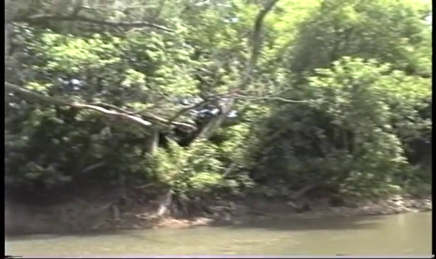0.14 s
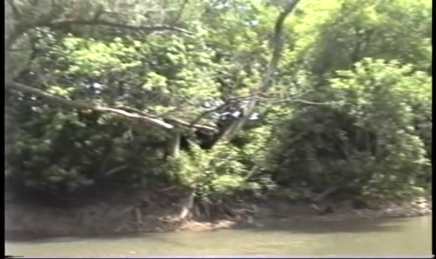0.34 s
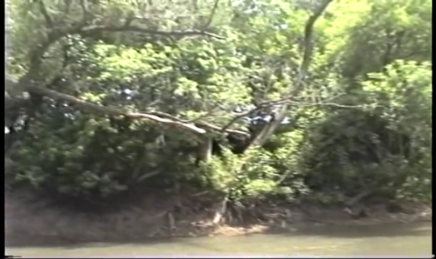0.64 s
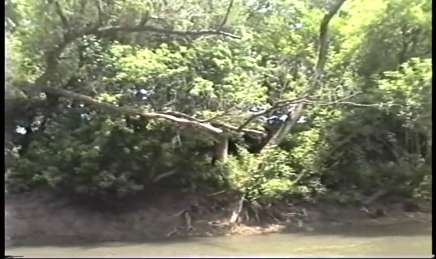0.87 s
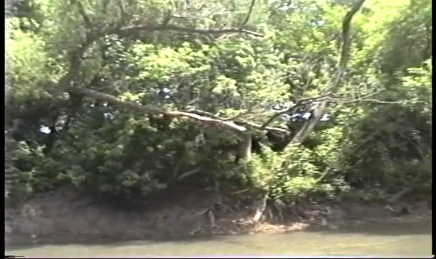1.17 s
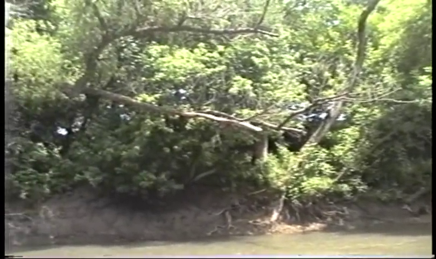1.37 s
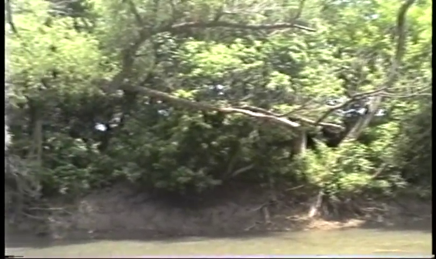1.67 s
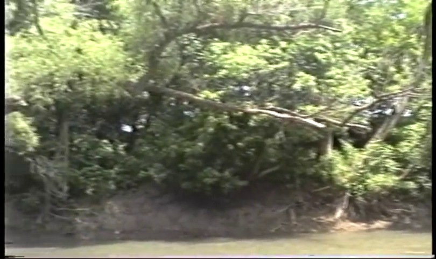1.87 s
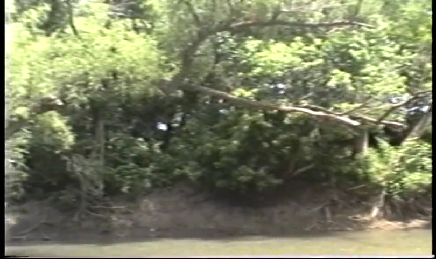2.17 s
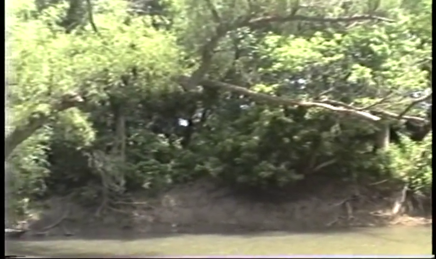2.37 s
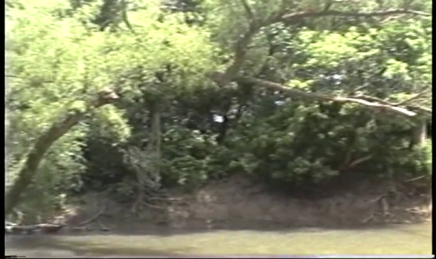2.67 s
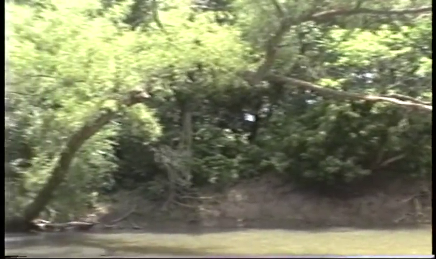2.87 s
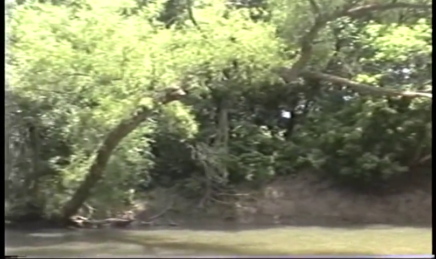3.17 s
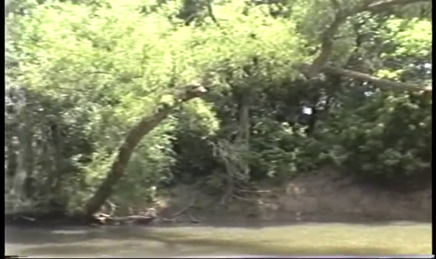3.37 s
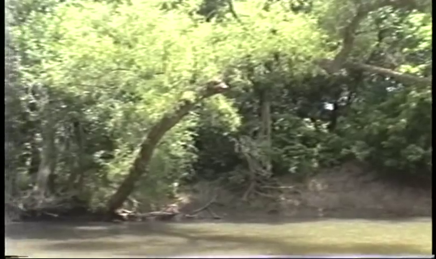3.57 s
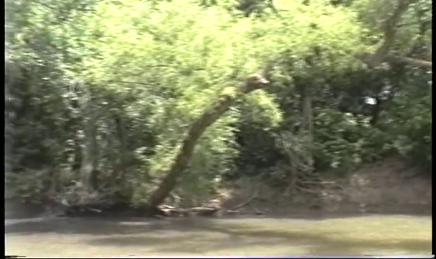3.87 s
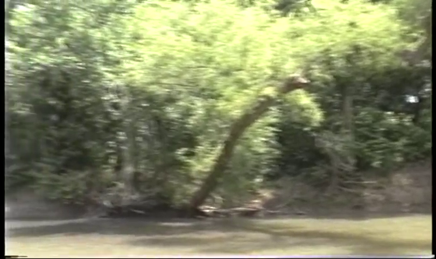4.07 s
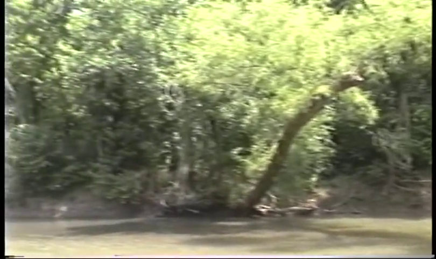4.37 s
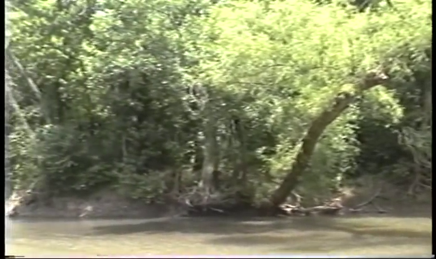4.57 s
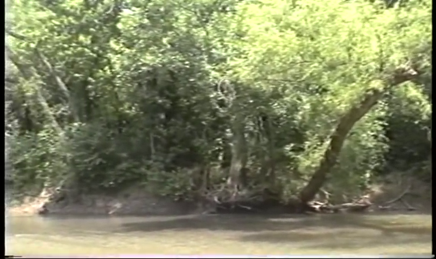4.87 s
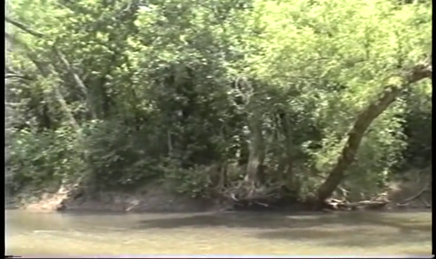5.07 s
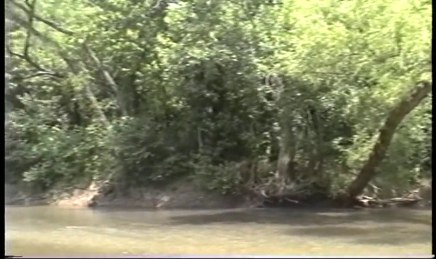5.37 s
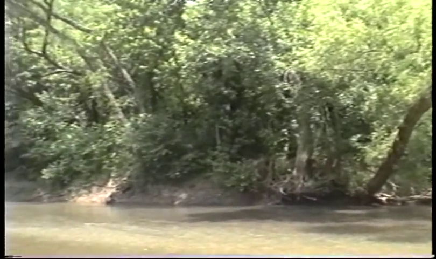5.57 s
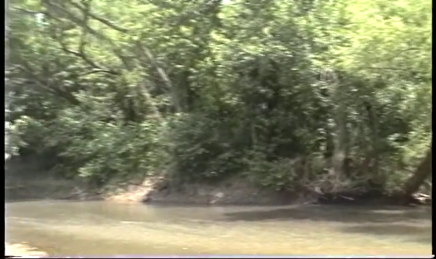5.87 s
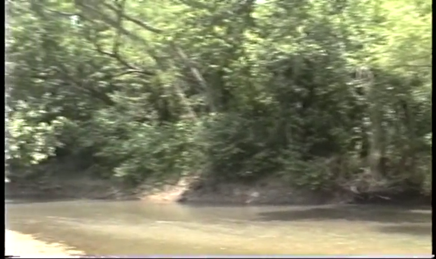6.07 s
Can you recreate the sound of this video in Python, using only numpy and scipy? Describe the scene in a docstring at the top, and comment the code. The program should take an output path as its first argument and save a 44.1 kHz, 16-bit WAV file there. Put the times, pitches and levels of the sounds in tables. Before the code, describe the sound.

A huge crowd of cicadas drones loudly in riverside woods, a harsh, high, shimmering buzz over a faint low motor hum from the camera.

```python
"""Cicadas fill the woods on a river bank, ahead and on both flanks, while a tape camcorder turns slowly left.
Thousands of tymbal clicks ring bodies of many sizes and merge into a drone that drifts in level and pitch.
Water and leaves murmur underneath as shaped noise, and one small knock sounds.
The camcorder picks up its own head drum as steady lines, stores sum and difference of its two sides
on companded tracks with hiss, and overloads both at loud peaks."""
import sys
import numpy as np
from scipy import signal
from scipy.fft import rfft, irfft
from scipy.io import wavfile
from scipy.ndimage import uniform_filter1d

SR = 44100
rng = np.random.default_rng(int(sys.argv[2]) if len(sys.argv) > 2 else 0)


def master_out(mix):
    """Clip the mix to full scale and print it as 16-bit PCM to the path in sys.argv[1]."""
    frames = np.transpose(np.atleast_2d(mix))
    ceiling = np.clip(frames, -1, 1)
    pcm = np.round(ceiling * 32767).astype(np.int16)
    wavfile.write(sys.argv[1], SR, pcm)


N = 274743
TIME = np.arange(N) / SR


def undb(db):
    """Amplitude factor of a level in dB."""
    return 10 ** (np.asarray(db) / 20)


def unit(x):
    """The same sound at an rms of 1."""
    return x / np.sqrt(np.mean(x ** 2))


# water and leaves around the microphone, as noise density:
# columns f/Hz, level of the sum/dB per Hz, level of the difference/dB per Hz, left minus right/dB
MURMUR_SPECTRUM = [(20, -74.5, -66, 3.5), (54, -75.5, -64.5, 3.5), (124, -78, -71.5, 1), (383, -80, -76, 2),
                   (910, -85, -81, 3.5), (1940, -87, -85, 2.5), (3270, -89.5, -98, 8),
                   (8800, -105, -105, 3), (14500, -102, -94, 0)]


def murmur():
    """Water and leaves: smooth noise, strongest in the bass and there wider than it is centred."""
    hz, *columns = np.transpose(MURMUR_SPECTRUM)
    log_bins = np.log(np.arange(N // 2 + 1) * SR / N + 1)
    sum_db, difference_db, pan_db = (np.interp(log_bins, np.log(hz), c) for c in columns)

    def noise_spectrum(density_db):
        """White noise shaped to a density per Hz."""
        return undb(density_db) * rfft(rng.standard_normal(N)) * np.sqrt(SR / 2)

    both = noise_spectrum(sum_db)
    apart = noise_spectrum(difference_db)
    left = (both + apart) * undb(pan_db / 2)
    right = (both - apart) * undb(-pan_db / 2)
    return irfft(np.array([left, right]), N)


DRUM_HZ = 29.97  # turning rate
DRUM_RIGHT_DB = -8.5  # right side against left
# strongest lines of the head drum, inside the camcorder:
# columns f/multiple of the turning rate, level on the left/dB rms
DRUM_LINES = [(1.0, -48), (1.5, -60), (2.0, -47), (3.0, -57), (8.0, -60), (15.0, -65), (16.0, -63),
              (17.0, -62), (18.0, -65), (20.0, -65), (31.0, -67), (32.0, -60), (36.0, -66)]
# faint combs of lines under them:
# columns f spacing/multiple of the turning rate, level on the left at the 10th multiple/dB rms
DRUM_COMBS = [(1.0, -69), (1.5, -71)]
COMB_DB_PER_OCTAVE, COMB_SCATTER_DB = -2.5, 2
COMB_TOP = 60  # multiples stay below this


def drum():
    """Head drum: steady lines on its turning rate, shaking the two sides in opposite sign."""
    lines = dict(DRUM_LINES)
    for spacing, db in DRUM_COMBS:
        for multiple in np.arange(spacing, COMB_TOP, spacing):
            slope_db = COMB_DB_PER_OCTAVE * np.log2(multiple / 10)
            scatter_db = COMB_SCATTER_DB * rng.standard_normal()
            lines.setdefault(multiple, db + slope_db + scatter_db)  # strong lines stay as they are
    buzz = 0
    for multiple, rms_db in lines.items():
        cycles = multiple * DRUM_HZ * TIME + rng.random()
        buzz = buzz + np.sqrt(2) * undb(rms_db) * np.sin(2 * np.pi * cycles)
    return np.array([buzz, -undb(DRUM_RIGHT_DB) * buzz])


# a small knock: columns t/s, peak level before panning/dB, f/Hz, left minus right/dB
KNOCK = [(3.006, -32, 1130, 5)]


def knock(width_s=0.00062):
    """Small knock: about one and a half cycles under a narrow bell."""
    out = 0
    for start_s, peak_db, hz, pan_db in KNOCK:
        t = TIME - start_s - width_s
        side_gain = undb(peak_db + np.array([[pan_db], [-pan_db]]) / 2)
        bell = np.exp(-(t / width_s) ** 2)
        out = out + side_gain * bell * np.cos(2 * np.pi * hz * t)
    return out


CLICK_HZ = 260.5  # typical tymbal clicks a second of one insect


def clicks(count, jitter=.08, size_db=3.0):
    """Tymbals: click trains of many insects, each at its own uneven rate."""
    steps = int(1.5 * 400 * N / SR)  # enough clicks to outlast the scene
    own_pace = rng.uniform(.8, 1.25, (count, 1))
    unevenness = 1 + jitter * rng.standard_normal((count, steps))
    period = SR / CLICK_HZ * own_pace * unevenness  # in samples
    head_start = SR / 20 * rng.random((count, 1))
    at = (np.cumsum(period, axis=1) - head_start).astype(int)
    size = undb(size_db * rng.standard_normal(at.shape))
    size = size * rng.choice([-1, 1], at.shape)  # buckling in or out
    heard = (at >= 0) & (at < N)
    return np.bincount(at[heard], size[heard], N)


def ring(x, hz, width_hz):
    """A resonance passed twice: tymbal and air sac, steep skirts."""
    b, a = signal.iirpeak(hz, hz / width_hz, SR)
    return signal.lfilter(b, a, signal.lfilter(b, a, x))


def walk(rate):
    """Random levels held 1 / rate s and slewed twice; spread near 1."""
    hold = int(SR / rate)
    steps = np.repeat(rng.standard_normal(N // hold + 1), hold)
    return 0.95 * uniform_filter1d(uniform_filter1d(steps, hold), hold)[:N]


BODY_WIDTH_HZ, BODY_SCATTER = 873, 0.069  # ring of one abdomen; spread of sizes as a share of the pitch
LOW_SHOULDER_HZ, LOW_WIDTH_HZ = 4416, 764
HIGH_SHOULDER_HZ, HIGH_WIDTH_HZ, HIGH_SCATTER = 8220, 440, 0.045


def crowd(pitch_hz, low_db, high_db, count=9, swell_db=1.0):
    """Groups of insects by body size; small ones take over when the pitch of the drone rises."""
    centre_hz = np.mean(pitch_hz)
    lean = (pitch_hz / centre_hz - 1) / BODY_SCATTER
    body = low = high = 0
    for z in np.linspace(-2, 2, count):  # large bodies to small ones
        share = np.exp(-(z - lean) ** 2 / 4) * undb(swell_db * walk(12.5))
        train = share * clicks(count=30)
        tune = 1 + BODY_SCATTER * z
        body = body + ring(train, centre_hz * tune, BODY_WIDTH_HZ)
        low = low + ring(train, LOW_SHOULDER_HZ * tune, LOW_WIDTH_HZ)
        high = high + ring(train, HIGH_SHOULDER_HZ * (1 + HIGH_SCATTER * z), HIGH_WIDTH_HZ)
    return unit(body) + undb(low_db) * unit(low) + undb(high_db) * unit(high)


LOW_SHOULDER_DB, HIGH_SHOULDER_DB = -12, -19  # against the body ring; the high one on average
HIGH_SINK_DB_PER_DB = 0.45  # the high shoulder lags behind when the crowd ahead swells
# the crowd in the woods as the camcorder turns:
# columns t/s, level ahead/dB, flanks minus ahead/dB, left minus right/dB, body pitch f/Hz
CROWD_COURSE = [(0.0, -24, 2, -1, 6264), (1.3, -24.5, 2.5, -0.5, 6170), (2.3, -23.5, 3.3, -2, 6190),
                (3.3, -23.5, 3, -1, 6120), (4.2, -22, 1.5, 1.5, 6090), (4.9, -20, 0, 1.5, 6190),
                (5.4, -21, 0.3, 0.5, 6260), (6.2, -23.5, 1.5, -0.5, 6210)]


def cicadas():
    """Cicadas: the crowd ahead reaches both sides alike, the flanks in opposite sign."""
    s, *columns = np.transpose(CROWD_COURSE)
    level_db, flank_db, pan_db, pitch_hz = (np.interp(TIME, s, c) for c in columns)
    high_db = HIGH_SHOULDER_DB - HIGH_SINK_DB_PER_DB * (level_db - np.mean(level_db))
    ahead = crowd(pitch_hz, LOW_SHOULDER_DB, high_db)
    flanks = undb(flank_db) * crowd(pitch_hz, LOW_SHOULDER_DB, high_db)
    side_gain = undb(level_db + np.array([pan_db, -pan_db]) / 2)
    return side_gain * np.array([ahead + flanks, ahead - flanks])


def scene():
    """The river bank as it reaches the two sides of the microphone, with the drum's buzz."""
    return cicadas() + murmur() + drum() + knock()


EMPHASIS_HZ = 2500., 12000.  # corners of the treble lift before the tape, undone after it
LOPSIDED = .93  # the upward swing clips first


def overload(x, ceiling):
    """The treble-lifted signal hits a ceiling; undoing the lift leaves a dull crackle at each loud peak."""
    zero, pole = np.exp(-2 * np.pi * np.array(EMPHASIS_HZ) / SR)
    # the lift has a gain of 1 at 6200 Hz, near the drone
    scale = abs(signal.freqz([1, -zero], [1, -pole], [6200], fs=SR)[1][0])
    lifted = signal.lfilter([1, -zero], [1, -pole], x) / scale
    lifted = signal.resample_poly(lifted, 2, 1)  # clip at twice the sample rate
    clipped = np.clip(lifted, -ceiling, LOPSIDED * ceiling)
    clipped = signal.resample_poly(clipped, 1, 2)
    return scale * signal.lfilter([1, -pole], [1, -zero], clipped)


def track(x, ceiling, bend_db, hiss_db, follow_s=.03):
    """One companded tape track: hiss and a square term ride on the loudness."""
    x = overload(x, ceiling)
    loudness = np.sqrt(uniform_filter1d(x ** 2, int(follow_s * SR)) + 1e-9)
    # the square term is an octave above the drone and a weaker rumble below it
    bend = signal.lfilter(*signal.butter(1, 2500., "high", fs=SR), x ** 2 / loudness)
    hiss_band = signal.butter(1, [900., 3500.], "band", fs=SR)
    hiss = signal.lfilter(*hiss_band, rng.standard_normal(N)) * loudness
    return x + undb(bend_db) * bend + undb(hiss_db) * hiss


SUM_CEILING, DIFFERENCE_CEILING = .215, .24  # in the treble-lifted signal
SUM_TRACK, DIFFERENCE_TRACK = (-60, -27), (-36, -27)  # (square term dB, tape hiss dB)
TOP_HZ = 15660  # final cut


def record(dry):
    """Camcorder: sum and difference go to separate tracks; the top fades and is cut."""
    both = track((dry[0] + dry[1]) / 2, SUM_CEILING, *SUM_TRACK)
    apart = track((dry[0] - dry[1]) / 2, DIFFERENCE_CEILING, *DIFFERENCE_TRACK)
    wet = [both + apart, both - apart]
    wet = signal.sosfilt(signal.butter(2, 12., "high", fs=SR, output="sos"), wet)
    wet = signal.sosfilt(signal.cheby1(6, 1, 15150., fs=SR, output="sos"), wet)
    return signal.sosfilt(signal.ellip(10, .5, 70, TOP_HZ, fs=SR, output="sos"), wet)


dry = scene()
out = record(dry)
master_out(out)
```